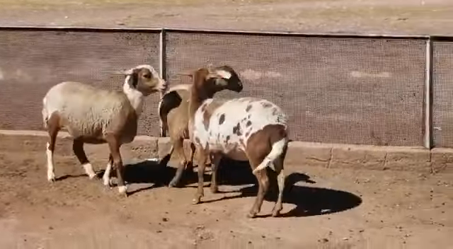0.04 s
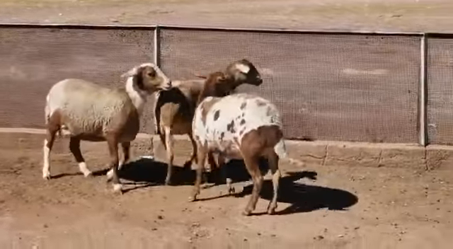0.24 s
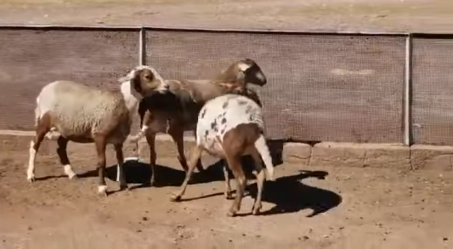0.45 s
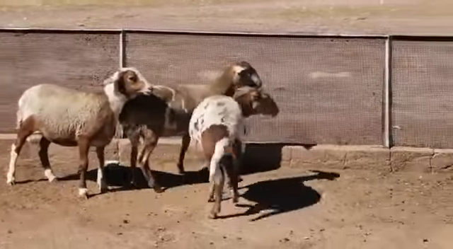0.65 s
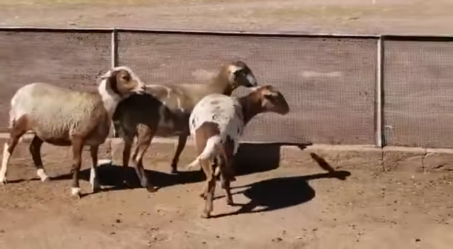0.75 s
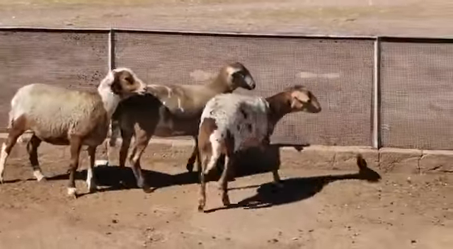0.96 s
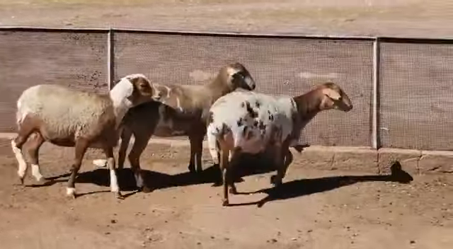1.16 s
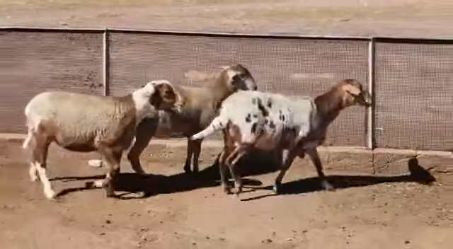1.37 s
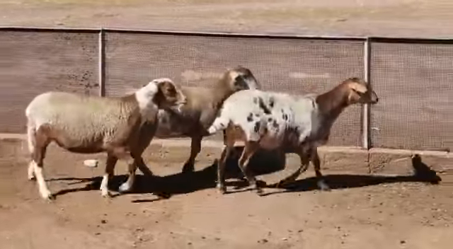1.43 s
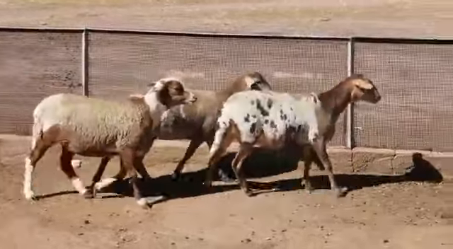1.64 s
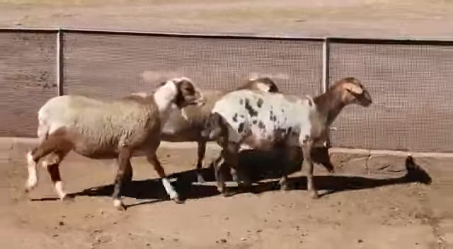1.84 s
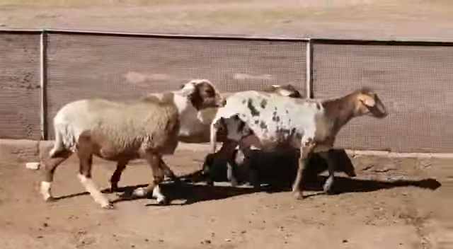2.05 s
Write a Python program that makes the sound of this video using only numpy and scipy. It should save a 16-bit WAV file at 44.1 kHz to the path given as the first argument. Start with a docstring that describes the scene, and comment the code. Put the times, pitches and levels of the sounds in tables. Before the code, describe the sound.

Soft, gritty steps of sheep walking on packed earth as a gust buffets the microphone.

```python
"""Hooves on dry, gritty dirt: three sheep walk across an outdoor pen, by a two-port microphone.
Each hoof taps the packed earth and crunches the grains on top; loose grit shifts between steps,
and the fence returns a faint echo. A gust rumbles and buffets the ports, the left one hardest.
Far off, a bird chirps over the hush of open air."""
import sys
import numpy as np
from scipy import signal
from scipy.fft import rfft, irfft
from scipy.io import wavfile
from scipy.ndimage import uniform_filter1d

SR = 44100
rng = np.random.default_rng(int(sys.argv[2]) if len(sys.argv) > 2 else 0)


def inscribe(sig):
    """Save sig as 16-bit PCM at rate SR to the path in sys.argv[1].

    A 1-D sig is mono; a 2-D sig holds one channel per row.
    Samples are clipped to [-1, 1] before scaling.
    """
    pcm = np.round(np.clip(np.atleast_2d(sig).T, -1, 1) * 32767)
    wavfile.write(sys.argv[1], SR, pcm.astype(np.int16))


N = 92610
T = np.arange(N) / SR

# Single eddies striking the microphone. Each row: time in seconds, relative thump level in dB,
# width in seconds, relative flutter level in dB, port (0 left, 1 right).
EDDIES = [(0.248, -7, 0.0017, -41, 0), (0.253, -11, 0.0016, -30, 0), (0.307, -11, 0.0015, -32, 0),
          (0.337, -10, 0.0016, -37, 0), (0.377, -17, 0.0015, -30, 0), (0.416, -11.5, 0.0018, -46, 0),
          (0.433, -15, 0.0015, -26, 0), (0.461, -15, 0.0014, -60, 0), (0.535, -9.5, 0.0016, -40, 1),
          (0.569, -7, 0.0022, -49, 1), (0.576, -6.5, 0.0029, -48, 0), (0.611, -18, 0.0011, -25, 1),
          (0.615, -3, 0.0033, -41, 0), (0.618, -35, 0.00072, -22.5, 1), (0.671, -11, 0.0019, -30, 1),
          (0.708, -21.5, 0.0011, -34.5, 1), (0.76, -10.5, 0.0026, -58.5, 1), (0.788, -50, 0.0011, -53, 0),
          (0.793, -23.5, 0.0012, -27.5, 1), (0.84, -12.5, 0.0013, -26, 1), (0.864, -3.5, 0.0014, -25, 0),
          (0.906, -6, 0.001, -16.5, 0), (0.908, -2, 0.0027, -26, 0), (0.945, -10, 0.0011, -17, 0),
          (0.957, -33.5, 0.0016, -24.5, 0), (0.991, -15, 0.0011, -28.5, 0), (1.004, -2.5, 0.0023, -39, 0),
          (1.019, -2, 0.0012, -17.5, 0), (1.04, -11, 0.0017, -35.5, 1), (1.072, -9.5, 0.0022, -23, 0),
          (1.086, -4.5, 0.0018, -42, 0), (1.103, -2.5, 0.0012, -44, 0), (1.119, -18, 0.00065, -22, 0),
          (1.158, -9.5, 0.0022, -56, 0), (1.182, -10.5, 0.0031, -29, 0), (1.204, -14.5, 0.0009, -20, 0),
          (1.239, -16.5, 0.0013, -32, 0), (1.258, -24.5, 0.00087, -29, 0), (1.346, -14.5, 0.0026, -62, 1),
          (1.427, -9, 0.0018, -36, 0), (1.478, -8.5, 0.0018, -24, 0), (1.524, -11.5, 0.0022, -24.5, 0),
          (1.538, -8.5, 0.0014, -18.5, 0), (1.545, -11.5, 0.0022, -18.5, 0), (1.608, -13, 0.0018, -39, 0),
          (1.67, -26, 0.0008, -56, 1), (1.727, -7.5, 0.0021, -49, 0), (1.789, -13, 0.0019, -29.5, 1),
          (1.828, -19, 0.0042, -61, 0)]


def from_db(db):
    """Decibels to gain."""
    return 10 ** (np.asarray(db) / 20)


def in_time(rows):
    """Join (seconds, value) points into a curve at every sample."""
    return np.interp(T, *np.transpose(rows))


def pan(db):
    """Left and right gains for a left-over-right balance in dB."""
    return from_db(np.array([[.5], [-.5]]) * db)


def colour(x, points):
    """Minimum-phase filter through (Hz, dB) points."""
    size = 2 ** 17
    hz, db = np.transpose(points)
    bin_hz = np.arange(size // 2 + 1) * SR / size
    gain = from_db(np.interp(np.log(bin_hz + 1), np.log(hz), db))
    cepstrum = irfft(np.log(gain))
    cepstrum[1:size // 2] *= 2
    cepstrum[size // 2 + 1:] = 0
    return irfft(rfft(x, size) * np.exp(rfft(cepstrum)))[..., :N]


def tint(x, points):
    """Colour that leaves the power of white noise unchanged."""
    hz, db = np.transpose(points)
    gain = from_db(np.interp(np.log(np.linspace(1, SR / 2, N // 2)), np.log(hz), db))
    return colour(x, points) / np.sqrt(np.mean(gain ** 2))


def even(x, span_s):
    """Take out level swings slower than the span."""
    size = int(span_s * SR)
    power = uniform_filter1d(uniform_filter1d(x ** 2, size), size)
    return x / np.sqrt(np.abs(power) + 1e-9)


def drift(per_s):
    """Slow random wander of spread about 1."""
    return np.interp(T * per_s, np.arange(N // 100), rng.standard_normal(N // 100))


def grains(per_s, spread_db, shared=0.43):
    """Random clicks of uneven size, part of their power common to both ports."""
    shape = (3, N)
    sizes = from_db(spread_db * np.minimum(rng.exponential(1, shape), 5))
    clicks = sizes * rng.choice([-1, 1], shape) * (rng.random(shape) < per_s / SR)
    clicks /= np.sqrt(np.mean(clicks ** 2))
    return np.sqrt(shared) * clicks[0] + np.sqrt(1 - shared) * clicks[1:]


def open_air():
    """The steady, low hush around the pen."""
    # Each row: frequency in Hz, relative level in dB.
    spectrum = [(30, 30.5), (100, 13.5), (300, 2.5), (700, -2), (1200, -4), (2000, -3), (3200, -3),
                (4200, -13.5), (6000, -12), (10000, -19.5), (13000, -17), (15500, -37.5)]
    return from_db(-57) * tint(rng.standard_normal((2, N)), spectrum)


def far_bird(tail_s=0.091):
    """Thin whistles glide through three pitches; distance smears them into a short diffuse tail."""
    # Each row: start and length in seconds, first, middle and last pitch in Hz, relative level in dB.
    notes = [(1.199, 0.039, 3650, 4700, 5320, -64.5), (1.235, 0.065, 4800, 5280, 4400, -59.5),
             (1.241, 0.042, 3650, 3800, 3546, -64), (1.289, 0.045, 5000, 4600, 4080, -57.5)]
    call = np.zeros(N)
    for start, length, first_hz, middle_hz, last_hz, db in notes:
        progress = np.clip((T - start) / length, 0, 1)
        glide = np.polyfit([0, .5, 1], [first_hz, middle_hz, last_hz], 2)
        phase = 2 * np.pi * np.cumsum(np.polyval(glide, progress)) / SR
        call += from_db(db) * np.sin(np.pi * progress) * np.sin(phase)
    scatter = rng.standard_normal((2, N)) * np.exp(-T / tail_s)
    scatter /= np.sqrt(np.sum(scatter ** 2) / 2)
    tail = signal.fftconvolve(call[None], scatter)[:, :N]
    return from_db(-2.5) * (call + from_db(4) * tail)


def wind():
    """Each port has its own turbulence: deep rumble, and flutter rising in gusts and round each eddy."""
    # Wind pressure at each port. Each row: time in seconds, relative level in dB.
    left_pressure = [(0, -50), (.04, -56), (.09, -79), (.13, -36.5), (.2, -45.5), (.24, -18.5),
                     (.36, -24.5), (.63, -20.5), (.71, -33), (.78, -21.5), (.83, -30.5), (.91, -24),
                     (.97, -22), (1.11, -6.5), (1.19, -26), (1.29, -31), (1.37, -33.5), (1.42, -17.5),
                     (1.5, -29.5), (1.57, -22.5), (1.83, -24), (1.9, -44.5), (2.1, -61.5)]
    right_pressure = [(0, -43), (.24, -57), (.3, -21), (.34, -40), (.39, -20.5), (.42, -24), (.53, -29.5),
                      (.67, -14), (.72, -28.5), (.79, -27.5), (.87, -26), (.96, -27.5), (1.0, -46.5),
                      (1.03, -21.5), (1.09, -27), (1.27, -35.5), (1.31, -31), (1.35, -30.5), (1.4, -37),
                      (1.52, -33), (1.7, -18.5), (1.8, -22.5), (1.89, -48.5), (1.92, -39.5), (2.01, -62.5),
                      (2.1, -44)]
    # Each row: frequency in Hz, relative level in dB.
    rumble_spectrum = [(15, -15), (30, 0), (65, 7), (120, 4.5), (220, -1), (320, -19.5), (450, -28),
                       (650, -39), (1000, -53.5), (2000, -76)]
    flutter_spectrum = [(100, -44), (230, 19), (380, 7.5), (560, -8.5), (750, -14), (1000, -24.5),
                        (1600, -50.5)]
    gust_db = np.array([in_time(left_pressure), in_time(right_pressure)]) + 20
    rumble = even(tint(rng.standard_normal((2, N)), rumble_spectrum), span_s=0.061)
    flutter = even(tint(rng.standard_normal((2, N)), flutter_spectrum), span_s=0.035)
    rumble_db = -22.5 + 0.87 * np.minimum(gust_db, 1.5)
    flutter_db = -49.5 + 1.53 * gust_db + 4.5 * drift(per_s=70)  # small eddies grow faster than the gust
    flutter_power = from_db(flutter_db) ** 2
    eddy_s = 0.0059
    for time, _, _, db, port in EDDIES:
        flutter_power[int(port)] += from_db(db - 4.5) ** 2 * np.exp(-((T - time) / eddy_s) ** 2)
    turbulence = rumble * from_db(rumble_db) + flutter * np.sqrt(flutter_power)
    return signal.sosfilt(signal.butter(2, 2500, fs=SR, output="sos"), turbulence)


def buffets(band_hz=(76, 601)):
    """An eddy crossing a port is one soft push and pull of pressure; wide eddies thud lower."""
    pressure = np.zeros((2, N))
    for (time, db, width_s, _, port), sign in zip(EDDIES, rng.choice([-1, 1], len(EDDIES))):
        passage = (T - time) / width_s
        pressure[int(port)] += sign * from_db(db - 3.5) * np.pi * passage / (1 + passage ** 2) ** 2
    return signal.sosfilt(signal.butter(2, band_hz, "band", fs=SR, output="sos"), pressure)


def grit(flicker_db=2.5, patchy_db=3):
    """Loose sand rustles as the feet drag; its colour shifts from one patch of ground to the next."""
    # Each row: time in seconds, level of the shuffling in dB.
    shuffle = [(0, -49.5), (.06, -61.5), (.13, -61), (.25, -71.5), (.35, -65), (.41, -70), (.46, -63.5),
               (.61, -67), (.63, -74), (.69, -65), (.88, -69.5), (1.06, -70.5), (1.2, -77.5), (1.34, -68),
               (1.42, -58.5), (1.58, -62), (1.65, -65), (1.77, -53.5), (1.83, -68), (1.945, -69.5),
               (1.96, -58), (2.05, -61.5), (2.1, -46.5)]
    # Where the feet are. Each row: time in seconds, left over right in dB.
    position = [(0, -1), (.4, 1), (1.0, -3), (1.4, -7.5), (1.8, -6), (2.0, -9), (2.1, -4)]
    # Each row: frequency in Hz, relative level in dB.
    sand_spectrum = [(300, 7), (800, -1), (1200, -5.5), (1800, 5.5), (2800, -0.5), (4400, 0), (6500, 3.5),
                     (8000, -9), (9500, -10), (12500, -13), (15500, -41)]
    level = from_db(in_time(shuffle) + flicker_db * drift(per_s=110))
    rustle = tint(level * grains(per_s=5400, spread_db=4), sand_spectrum)
    spectrum = rfft(rustle, 2 * N)
    edges_hz = [1300, 2400, 3600, 5200, 7800]
    band_of_bin = np.searchsorted(edges_hz, np.linspace(0, SR / 2, N + 1))
    patches = np.zeros((2, N))
    for k in range(len(edges_hz) + 1):
        band = irfft(spectrum * (band_of_bin == k))[:, :N]
        patches += band * from_db(patchy_db * drift(per_s=25))
    return patches * pan(in_time(position))


def hoof_envelope(start, length, release_s, attack_s=0.0016, lead_in_s=0.004, settle_s=0.024):
    """Each hoof sound swells in briefly, hits, holds and dies away; crumbs settle faintly after it."""
    since_lift = np.maximum(T - start - length, 0)
    lead_in = from_db(-23.5) * np.exp(-np.abs(T - start) / lead_in_s)
    press = np.clip((T - start) / attack_s, 0, 1) * np.exp(-since_lift / release_s)
    settle = from_db(-21) * np.exp(-since_lift / settle_s) * (T > start)
    return np.maximum(press, np.maximum(lead_in, settle))


def hooves(grains_per_s=9000, spread_db=0.5):
    """Each hoof crushes bright grains and gives the packed earth a dull tap."""
    # Each row: start and length in seconds, relative crunch and tap levels in dB, left over right in dB.
    footfalls = [(0.086, 0.006, -50.5, -44.5, -1), (.110, 0.0058, -44.5, -52, -4),
                 (0.129, 0.00076, -38.5, -45, 5), (0.216, 0.0027, -46.5, -58, -2),
                 (0.295, 0.011, -51.5, -54, 1), (0.319, 0.0017, -61, -51, -4),
                 (0.432, 0.017, -40, -42, 1.5), (0.581, 0.0058, -50, -47, -1.5),
                 (0.603, 0.0013, -44, -74, 5), (0.654, 0.0013, -44, -56, 10), (0.681, 0.023, -50.5, -62, 1),
                 (0.763, 0.007, -46.5, -54.5, 1), (0.779, 0.0057, -45, -68, 21),
                 (0.915, 0.002, -66, -49.5, -2.5), (0.958, 0.0011, -43, -55.5, 0),
                 (0.977, 0.00093, -50, -64, 5), (1.005, 0.0012, -31.5, -50.5, -3),
                 (1.039, 0.0029, -53.5, -79.5, 19), (1.112, 0.0086, -51, -52.5, -6.5),
                 (1.245, 0.0042, -50, -85, -8), (1.272, 0.006, -49, -66, -17),
                 (1.284, 0.0099, -52.5, -55.5, 1), (1.425, 0.0053, -43, -45, -1),
                 (1.433, 0.0096, -44, -42.5, -9), (1.556, 0.0071, -34, -43.5, -2.5),
                 (1.619, 0.024, -48, -80, -6), (1.651, 0.001, -23, -80, -15.5),
                 (1.702, 0.0056, -40.5, -56, 0), (1.74, 0.0054, -38, -47, 2), (1.777, 0.0076, -58, -55, -1),
                 (1.801, 0.0084, -74, -56, 8), (1.958, 0.0027, -29, -43.5, 4.5),
                 (1.963, 0.0045, -80, -40.5, -2), (1.997, 0.0042, -53, -54, 7),
                 (2.021, 0.0074, -47, -56, 7), (2.077, 0.0027, -31, -38.5, -5),
                 (2.083, 0.0039, -52, -51, 7)]
    # Each row: frequency in Hz, relative level in dB.
    crunch_spectrum = [(700, -34), (1500, -20), (2800, 3), (4400, 4.5), (6500, 8), (8000, -1.5),
                       (9500, -4.5), (12500, -10.5), (15500, -37)]
    tap_spectrum = [(300, -48.5), (700, -1.5), (1150, -10.5), (1500, -1), (1900, 2.5), (2400, -5),
                    (3300, -35.5), (5000, -4), (10000, -94)]
    crush, press = np.zeros((2, 2, N))
    for start, length, crunch_db, tap_db, side_db in footfalls:
        crush += hoof_envelope(start, length, release_s=0.00078) * from_db(crunch_db - 9.5) * pan(side_db)
        press += hoof_envelope(start, length, release_s=0.0019) * from_db(tap_db - 5.5) * pan(side_db)
    sand = even(grains(grains_per_s, spread_db), span_s=0.0062)
    earth = even(tint(grains(grains_per_s, spread_db), tap_spectrum), span_s=0.0027)
    return tint(crush * sand, crunch_spectrum) + press * earth


def fence_echo(ground, delay_s=0.0074):
    """The nearby fence throws the footsteps back, left and right swapped."""
    return from_db(-19) * np.array([np.interp(T - delay_s, T, side, left=0) for side in ground[::-1]])


def microphone_ports(sound):
    """The cavities behind the two ports colour the sound and ring a little."""
    # Each row: frequency in Hz, gain in dB.
    left_response = [(1000, 0), (2200, -1), (3200, -5.5), (4800, -8.5), (5500, -4.5), (6800, -1.5),
                     (7500, -3), (8200, -6), (8800, 0.5), (9350, 4), (9900, -0.5), (11400, 3),
                     (12600, -4.5), (13600, 5), (15500, -11)]
    right_response = [(1000, -1), (2200, -1.5), (2950, -8.5), (3600, -2), (3950, -8.5), (4300, 1),
                      (5100, -5), (5700, -10), (6600, -16), (7200, -12.5), (8400, -7), (9200, -9),
                      (10200, -7.5), (12600, -6), (15500, 11)]
    # Each row: port (0 left, 1 right), frequency and width in Hz, gain of the added ring.
    resonances = [(0, 2050, 20, 1), (1, 1000, 21, 1.95), (1, 2850, 180, 1.5), (0, 13000, 67, 0.23),
                  (1, 3985, 170, 1.85), (0, 9500, 350, 0.48), (0, 4100, 200, 0.5)]
    heard = np.array([colour(sound[0], left_response), colour(sound[1], right_response)])
    for port, hz, width_hz, gain in resonances:
        ring = signal.lfilter(*signal.iirpeak(hz, hz / width_hz, fs=SR), heard[int(port)])
        heard[int(port)] += gain * ring
    return heard


def scene():
    """The pen and the far bird heard through the ports, with wind right on the microphone."""
    ground = hooves() + grit()
    outdoors = ground + fence_echo(ground) + open_air() + far_bird()
    return microphone_ports(outdoors) + wind() + buffets()


def record(dry, cutoff_hz=15650):
    """The recorder cuts the top treble steeply."""
    return signal.sosfilt(signal.ellip(10, .1, 80, cutoff_hz, fs=SR, output="sos"), dry)


dry = scene()
out = record(dry)
inscribe(out)
```